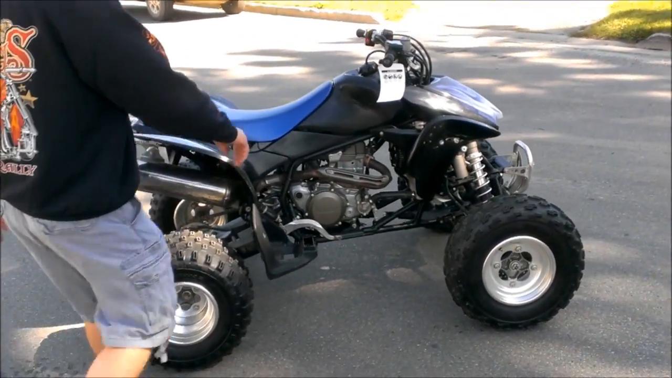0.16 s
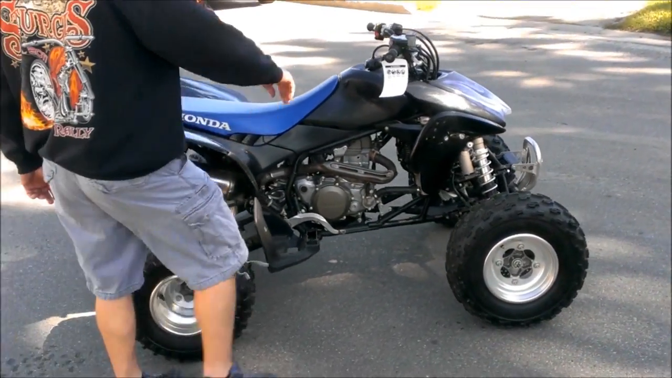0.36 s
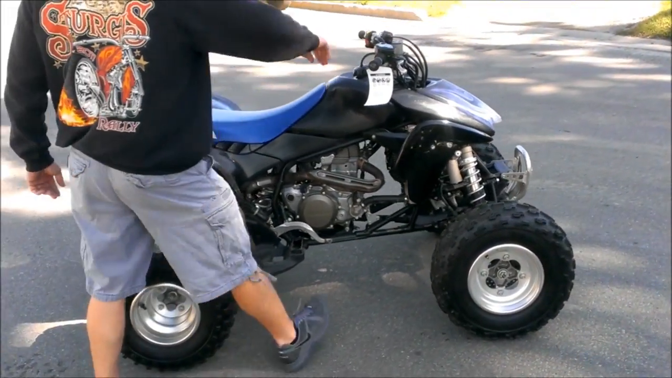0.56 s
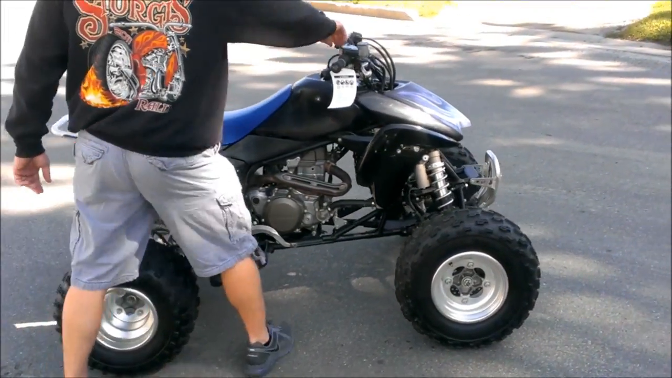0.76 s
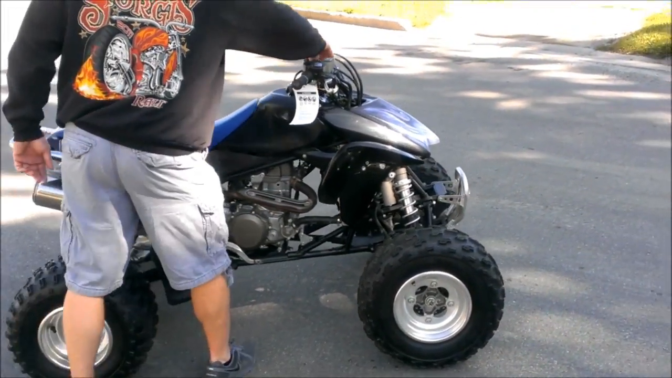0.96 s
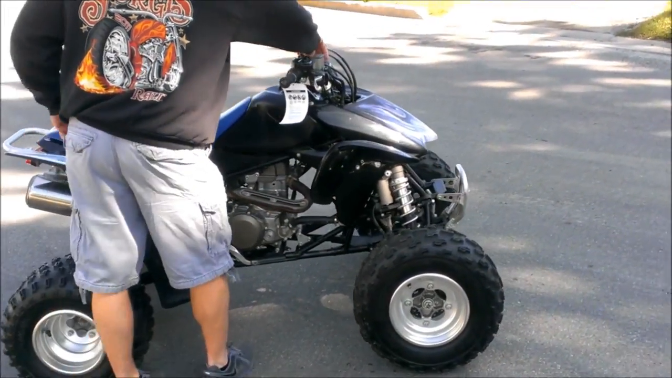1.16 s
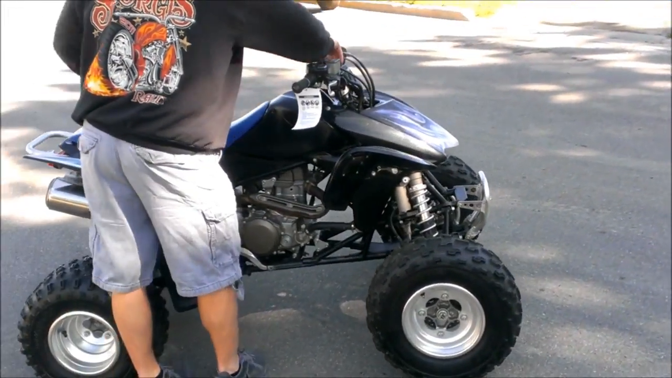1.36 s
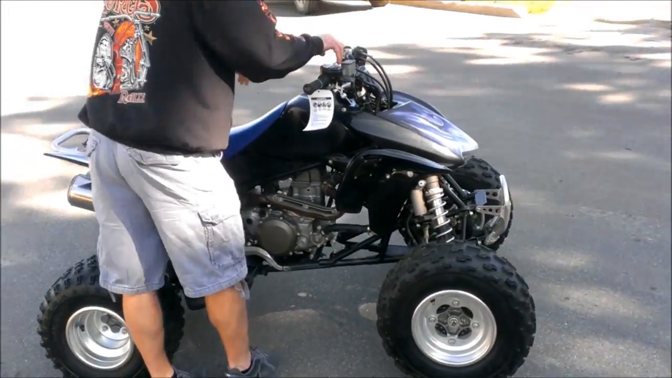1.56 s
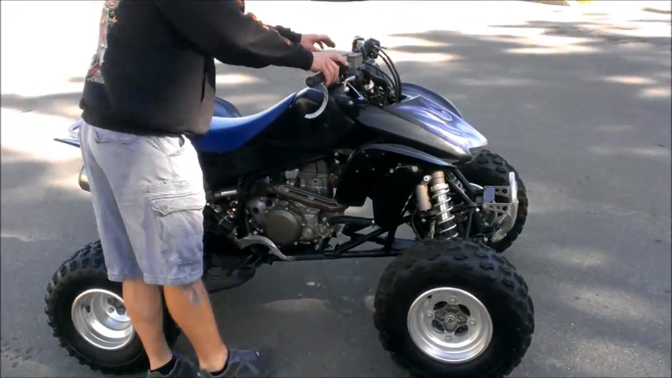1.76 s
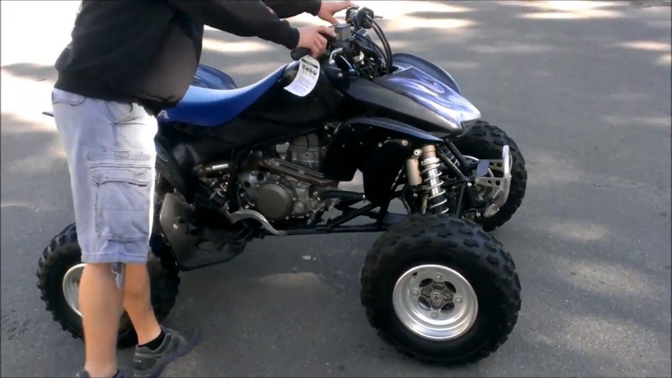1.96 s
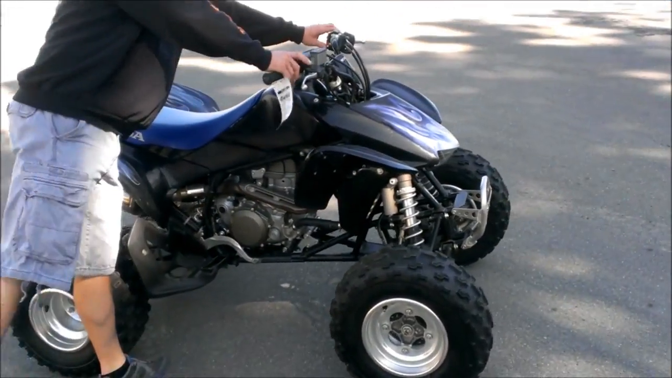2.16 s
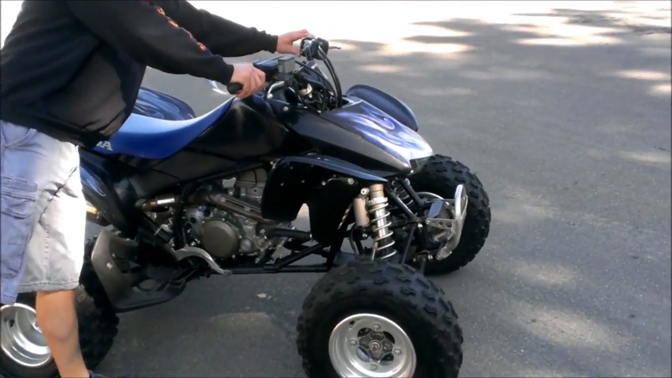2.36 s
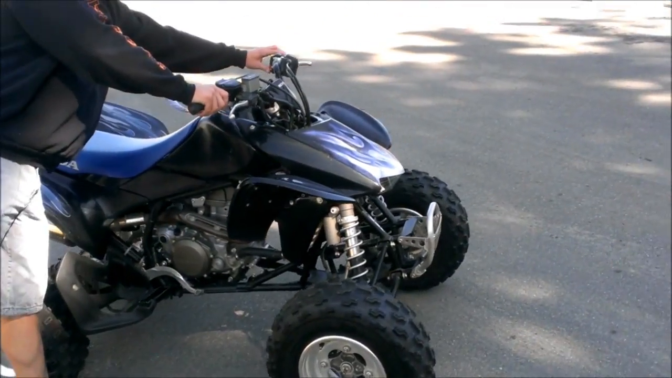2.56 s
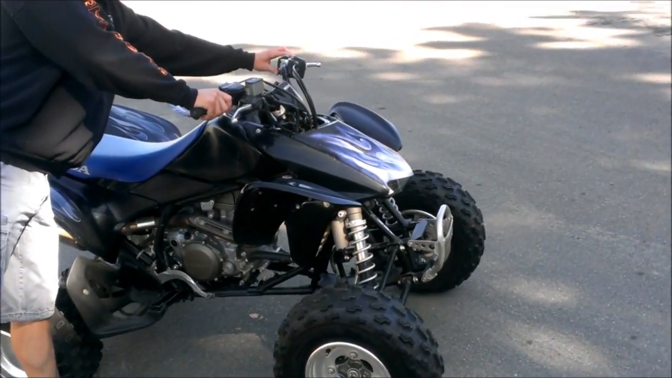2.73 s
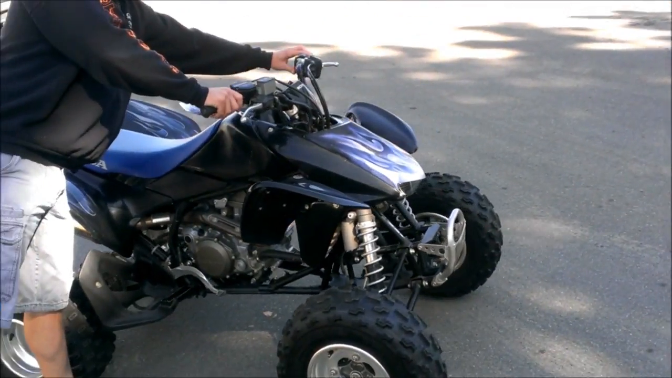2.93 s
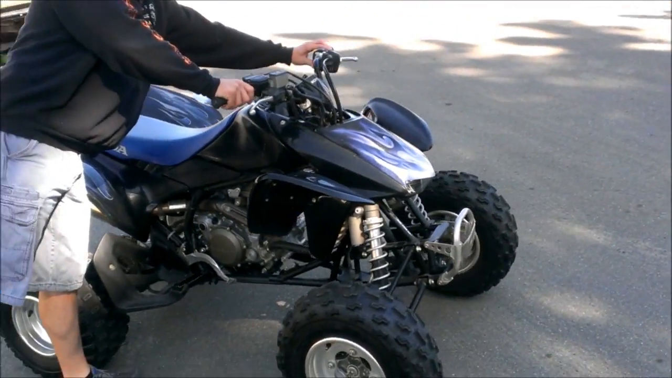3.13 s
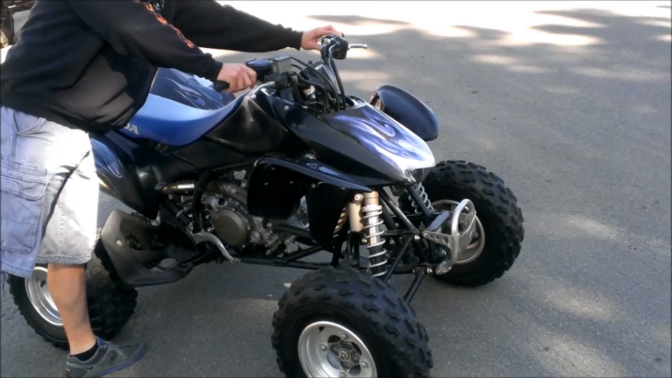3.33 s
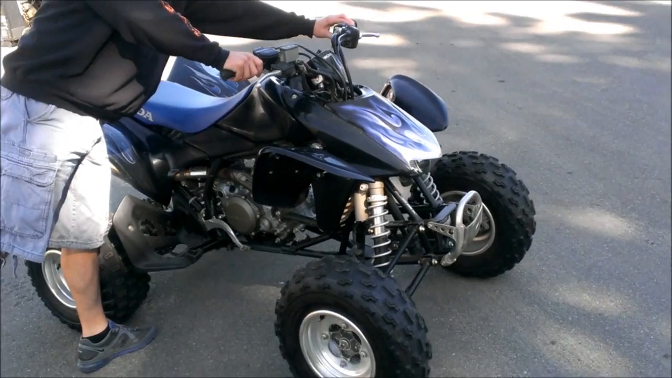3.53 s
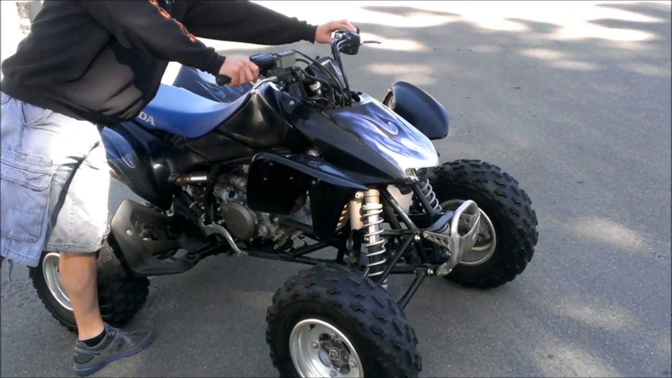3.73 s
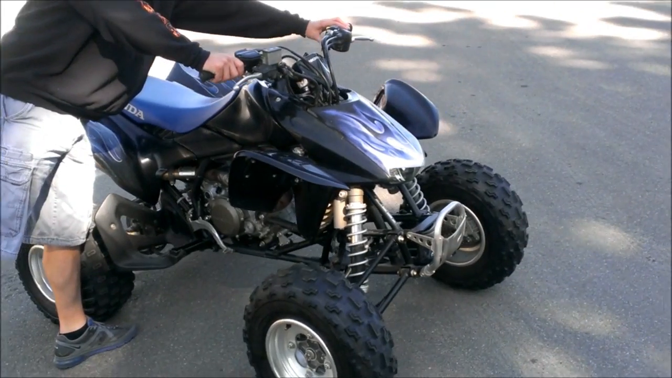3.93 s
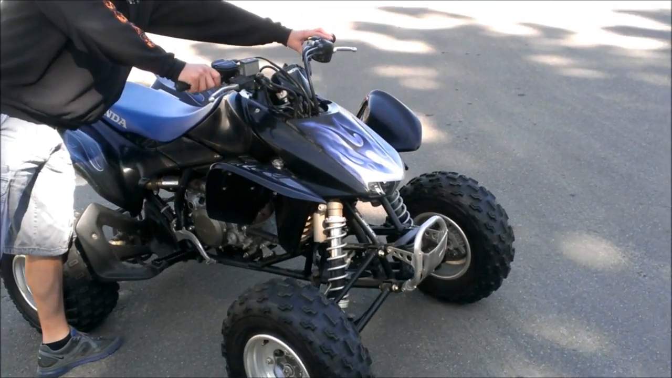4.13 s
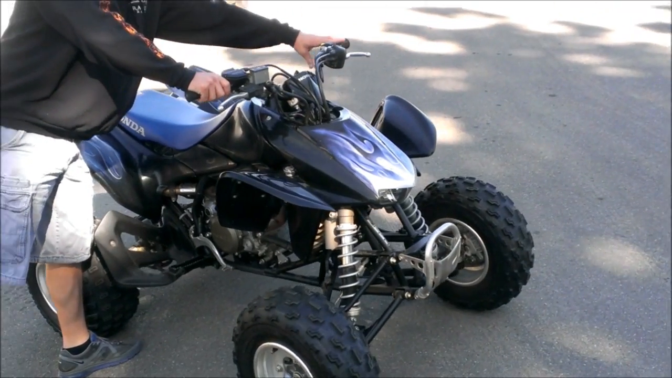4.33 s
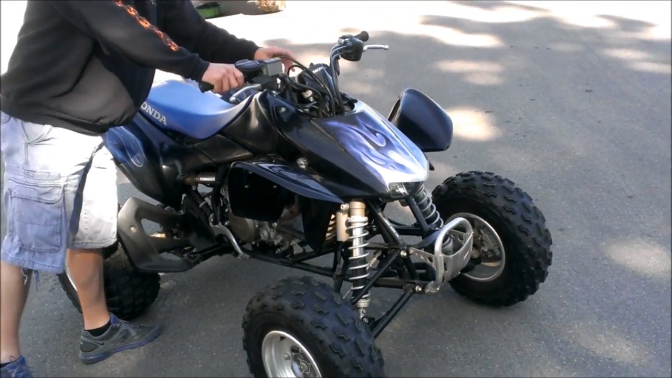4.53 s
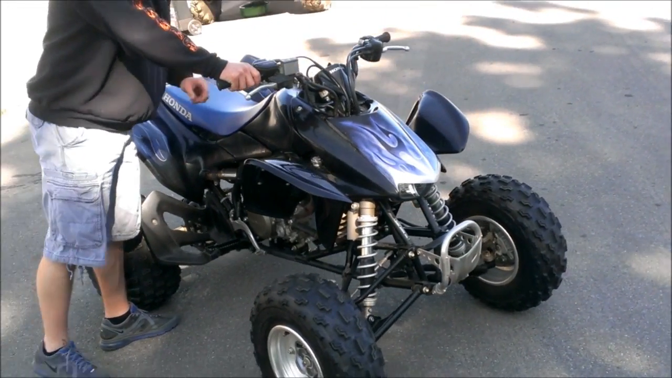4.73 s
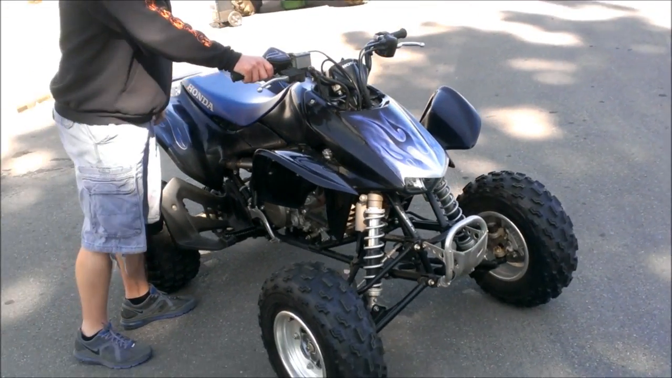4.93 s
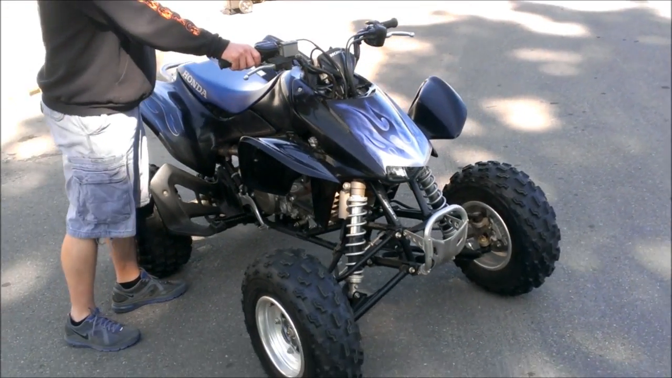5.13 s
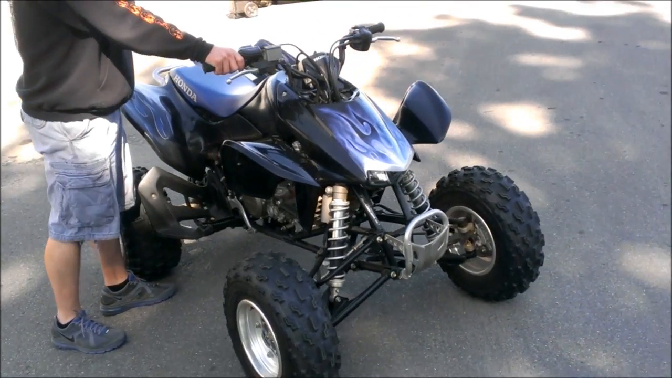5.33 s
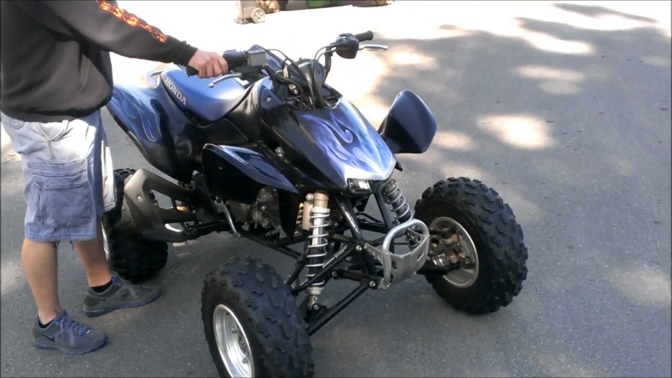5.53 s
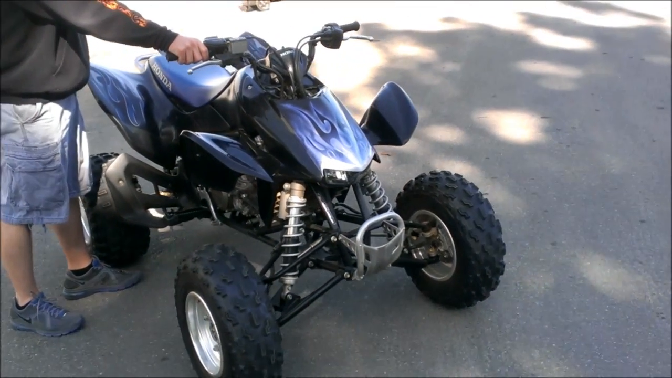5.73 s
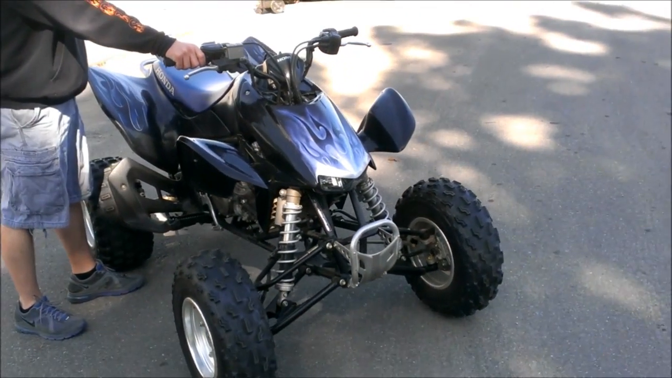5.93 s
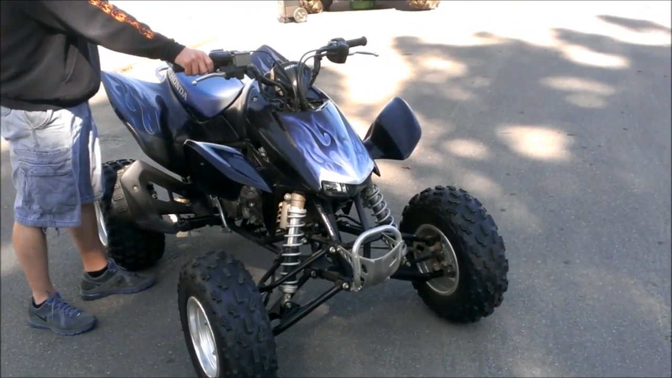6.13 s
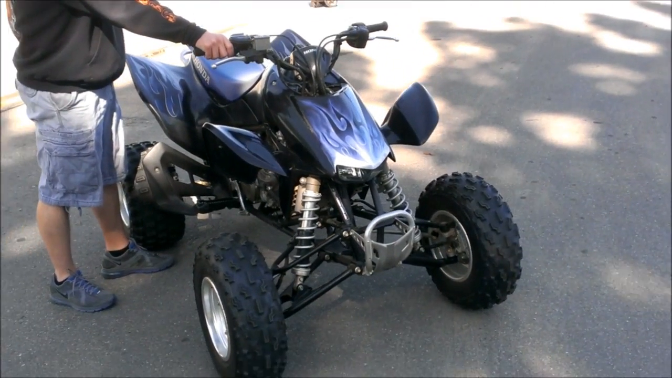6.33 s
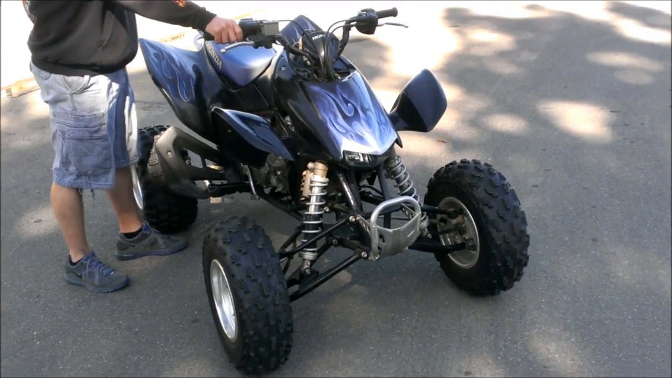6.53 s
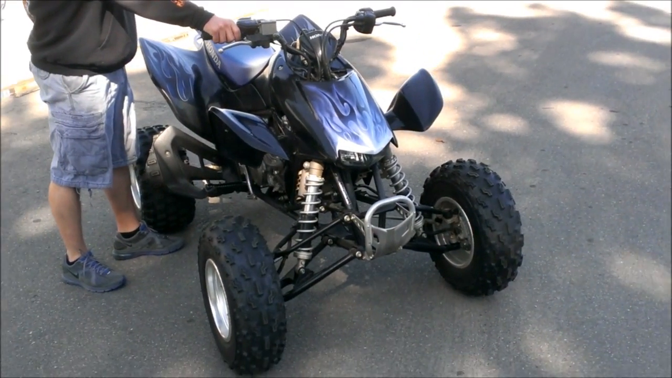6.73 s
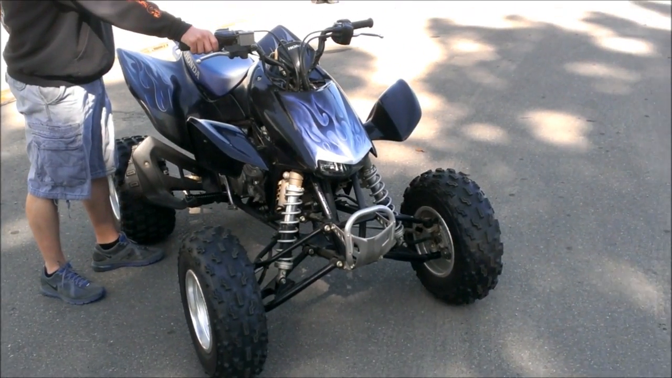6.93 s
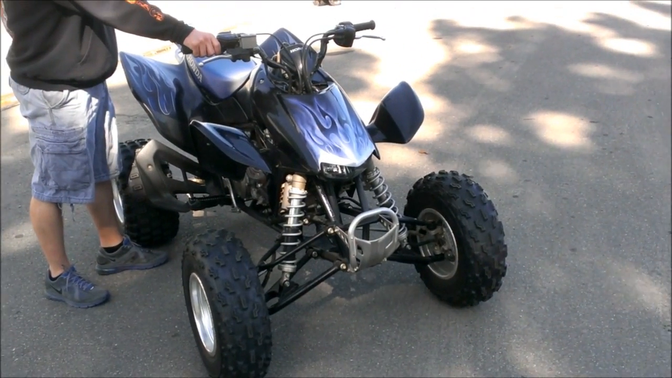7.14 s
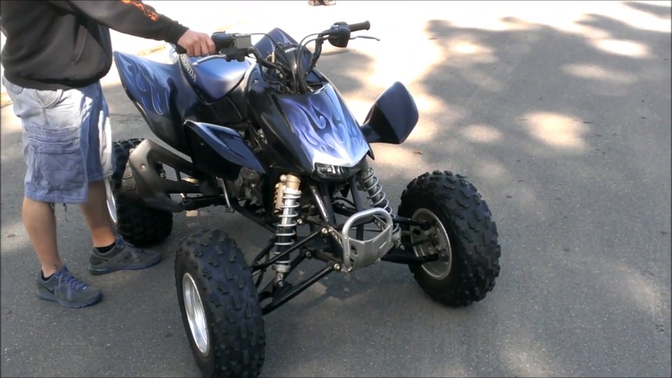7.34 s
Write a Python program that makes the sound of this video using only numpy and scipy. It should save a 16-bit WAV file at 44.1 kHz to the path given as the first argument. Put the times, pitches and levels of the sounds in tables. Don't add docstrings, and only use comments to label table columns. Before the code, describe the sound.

Faint handling clicks and footfalls, a half-second starter grind, then a loud thumping quad bike engine with barking throttle blips and metallic clatter.

```python
import sys
import numpy as np
from scipy import signal
from scipy.fft import rfft, irfft, next_fast_len
from scipy.io import wavfile
from scipy.ndimage import uniform_filter1d, minimum_filter1d

SR = 44100
rng = np.random.default_rng(int(sys.argv[2]) if len(sys.argv) > 2 else 0)


def transcribe(signal):
    frames = np.atleast_2d(signal).T
    limited = np.clip(frames, -1, 1)
    pcm = np.round(limited * 32767).astype(np.int16)
    wavfile.write(sys.argv[1], SR, pcm)


def how_loud(loudness_db):
    steps = np.asarray(loudness_db, float) / 20
    return 10 ** steps


N = 326008
FIRST_BLOW_S, IDLE_PER_S = 3.6351, 15

# start in seconds [s], peak level [dB], pitch [Hz], time to fade by 60 dB [s].
FOOTFALLS = [(0.136, -42, 97, 0.077), (0.311, -57, 45.8, 0.08), (0.312, -44, 67.3, 0.1),
             (0.747, -42, 152, 0.052), (1.093, -29, 112, 0.041), (1.254, -40, 92, 0.073),
             (1.329, -51, 169, 0.16), (1.556, -55, 75.4, 0.088), (1.771, -37, 45.8, 0.08),
             (1.773, -31, 63, 0.048), (1.936, -50, 58.6, 0.082), (2.061, -41, 99, 0.14),
             (2.18, -48, 115, 0.15), (2.4, -40, 88.8, 0.052), (2.557, -40, 56.7, 0.24),
             (2.684, -28.5, 69.6, 0.078), (2.855, -21.5, 85, 0.072)]


def in_time(rows):
    s, *columns = np.transpose(rows)
    return [np.interp(np.arange(N) / SR, s, c) for c in columns]


def between(t0, t1):
    return np.interp(np.arange(N) / SR, [t0, t0 + .003, t1 - .003, t1], [0, 1, 1, 0])


def rms_one(x):
    return x / np.sqrt(np.mean(x ** 2) + 1e-20)


def sine(cycles):
    return np.sin(2 * np.pi * cycles)


def fading(db, t, t60):
    return how_loud(db - 60 * t / t60)


def low_pass(x, order, hz):
    return signal.sosfilt(signal.butter(order, hz, fs=SR, output="sos"), x)


def resonance(x, hz, width_hz):
    r = np.exp(-np.pi * width_hz / SR)
    poles = [1, -2 * r * np.cos(2 * np.pi * hz / SR), r * r]
    return signal.lfilter([(1 - r * r) / 2, 0, (r * r - 1) / 2], poles, x)


def flicker(flicker_hz):
    return rms_one(low_pass(rng.standard_normal(N), 2, flicker_hz))


def grit(grain_db, flicker_hz):
    return rng.standard_normal((2, N)) * how_loud(grain_db * flicker(flicker_hz))


def at_hz(points, hz):
    curve_hz, value = np.transpose(points)
    return np.interp(np.log(hz), np.log(curve_hz), value)


def coloured(spectrum, source):
    # pitch [Hz], likeness from 0 to 1 [share].
    likeness = [(150, 0.87), (700, 0.72), (1200, 0.62), (2000, 0.29), (2500, 0.54), (3500, 0.28),
                (5000, 0.18), (9000, 0.62)]
    size = next_fast_len(N)
    hz = np.maximum(np.arange(size // 2 + 1) * SR / size, 1)
    mid, side = rfft(source, size) * how_loud(at_hz(spectrum, hz))
    alike = np.clip(at_hz(likeness, hz), 0, 1)
    pair = np.sqrt(1 + alike) * mid + np.sqrt(1 - alike) * side * [[1], [-1]]
    return irfft(pair, size)[:, :N]


def add(out, s, sound):
    i = round(s * SR)
    out[..., i:i + sound.shape[-1]] += sound[..., :N - i]


def street():
    # time [s], level over the still street [dB].
    stir = [(0, 5), (.45, 0), (1.1, 8), (1.4, 5.5), (1.55, 1), (1.77, 5), (2.4, 10.5), (2.95, 8.5),
            (3.16, 4.5)]
    # pitch [Hz], level per Hz [dB].
    rumble_colour = [(12, -46.5), (20, -17), (27, -20.5), (48, 0.5), (90, 1.5), (471, -17), (551, -16),
                     (600, -40), (780, -45), (1320, -120)]
    # pitch [Hz], level per Hz [dB].
    rustle_colour = [(180, -28.5), (300, -11), (597, -7.5), (634, -6.5), (830, -1.5), (949, -6), (1320, -9),
                     (1830, -12), (9370, -27), (10500, -12), (13900, -64.5), (22000, -120)]
    stir_db, = in_time(stir)
    steps, t = np.array(FOOTFALLS)[:, 0], np.arange(N) / SR
    last_step = steps[np.clip(np.searchsorted(steps, t) - 1, 0, None)]
    since = np.abs(t - last_step)
    shuffle_db = -1.5 + 3 * np.clip(1.5 - since / 0.073, 0, 1)
    rumble = rms_one(coloured(rumble_colour, grit(2.65, 34)))
    rustle = rms_one(coloured(rustle_colour, grit(0.7, 54)))
    return how_loud(-55 + stir_db + shuffle_db) * rumble + how_loud(-60 + 0.26 * stir_db) * rustle


def bumps():
    # time [s], left over right [dB].
    walk_pan = [(0, -1), (.7, -3), (1.2, 7), (1.7, 0.1), (2.2, -9), (2.7, 17), (3.1, 7)]
    out, t = np.zeros(N), np.arange(int(.2 * SR)) / SR
    for s, db, hz, t60 in FOOTFALLS:
        swell = 1 - np.exp(-t * hz * 0.51)
        add(out, s, fading(db + 13.5, t, t60) * swell * sine(hz * t))
    return out * how_loud(np.outer([.5, -.5], in_time(walk_pan)[0]))


def clicks():
    # pitch [Hz], level [dB], time to fade by 60 dB [s].
    key_modes = [(825, 0.5, 0.012), (1400, -2.5, 0.017), (2370, -5, 0.0079), (2870, -8, 0.0088),
                 (3420, 0, 0.012), (3860, 3, .012), (4500, -8, 0.013)]
    # pitch [Hz], level [dB], fade time [s].
    switch_modes = [(1090, 7.5, 0.019), (1275, 2, 0.041), (1880, 8, 0.015), (2370, 2, .01),
                    (2830, 7.5, 0.014), (3370, -1, 0.017), (3920, -5, 0.015), (4390, 0, 0.025),
                    (6670, -16, 0.012), (7950, -12, 0.0099)]
    # pitch [Hz], level [dB], fade time [s].
    lever_modes = [(474, 8, 0.0062), (1120, 4, 0.0079), (1860, -6, 0.006), (2730, -2, .006),
                   (3350, 6, .008), (4000, 1, 0.016), (4800, -4, 0.006)]
    # pitch [Hz], level [dB], fade time [s].
    panel_modes = [(273, 8, 0.029), (400, 8.5, 0.037), (820, 6, 0.019), (1290, -20, 0.011),
                   (1800, -20, .01), (2288, -6, 0.015), (3860, -20, .012)]
    # pitch [Hz], level [dB], fade time [s].
    cloth_modes = [(500, 5, 0.0056), (1400, -9, 0.0031), (3270, -6, 0.0027), (4280, -6, .004)]
    # pitch [Hz], level [dB], fade time [s].
    latch_modes = [(700, 12, 0.0091), (1100, -2, 0.0063), (1750, -5, .006), (3100, -17, .006)]
    # scrape swell [s], scrape fade [s], tap over scrape [dB], dull above [Hz].
    strikes = [
        (0.0025, 0.015, 2, 4100),
        (0.0034, 0.018, -15, 12000),
        (.0004, .004, 20, 3500),
        (0.00097, 0.024, -9, 2100),
        (0.0096, 0.31, -20, 4100),
        (.0006, .01, 9, 3500),
    ]
    # start [s], peak level [dB].
    key_touches = [
        (.144, -42),
        (.151, -20.5),
        (.155, -24),
        (.159, -36),
        (.163, -28),
        (.171, -33),
        (.182, -40),
        (0.192, -38),
        (1.429, -47),
    ]
    # start [s], peak level [dB].
    switch_touches = [
        (1.317, -43),
        (1.330, -19.5),
        (2.339, -60),
        (2.489, -55),
    ]
    # start [s], peak level [dB].
    lever_touches = [
        (2.415, -16),
    ]
    # start [s], peak level [dB].
    panel_touches = [
        (.329, -48),
        (1.111, -36),
        (1.7856, -27),
        (1.808, -40),
        (2.363, -34),
        (2.906, -27),
    ]
    # start [s], peak level [dB].
    cloth_touches = [
        (.79, -48),
        (1.075, -41.5),
        (1.11, -44),
        (1.77, -43),
        (2.06, -45),
        (2.19, -48),
        (2.855, -39),
    ]
    # start [s], peak level [dB].
    latch_touches = [
        (1.753, -33),
        (.866, -41),
    ]
    # time [s], left over right [dB].
    hand_pan = [(0, -3), (.8, -8), (1.3, 4.5), (1.8, -11), (2.4, -11), (2.9, 2)]

    out, t = np.zeros((2, N)), np.arange(int(.15 * SR)) / SR
    all_modes = key_modes, switch_modes, lever_modes, panel_modes, cloth_modes, latch_modes
    all_touches = key_touches, switch_touches, lever_touches, panel_touches, cloth_touches, latch_touches
    for modes, (swell_s, dies_s, tap_db, dull_hz), touches in zip(all_modes, strikes, all_touches):
        for s, db in touches:
            noise = rng.standard_normal((2, len(t)))
            scrape = fading(0, np.maximum(t - swell_s, 0), dies_s) * np.minimum(t / swell_s, 1) ** 2
            push = (noise[0] + 1.05 * noise) * scrape
            push[:, 0] -= 10 * how_loud(tap_db)
            sound = sum(how_loud(mode_db) * t60 * resonance(push, hz, 2.17 / t60) for hz, mode_db, t60 in modes)
            sound = low_pass(sound, 4, dull_hz)
            scattered = rms_one(resonance(resonance(noise[:, ::-1], 2200, 2500), 2200, 2500))
            tail = fading(-34, t, .25) * np.minimum(t / .008, 1) * scattered
            pan_db = np.interp(s, *np.transpose(hand_pan))
            pan = how_loud([[pan_db / 2], [-pan_db / 2]])
            add(out, s, how_loud(db) * (sound / np.abs(sound).max() + tail) * pan)
    return out


def scuffs():
    # start [s], length [s], pitch [Hz], width [Hz], level [dB].
    rubs = [
        (.79, .05, 2900, 500, -55.5),
        (.845, 0.049, 3400, 1100, -52.5),
        (2.27, .03, 3900, 250, -66),
        (2.328, 0.039, 3800, 250, -60),
        (1.075, 0.059, 4000, 900, -57),
        (1.07, 0.076, 310, 120, -45),
    ]
    out, noise = np.zeros((2, N)), rng.standard_normal((2, int(.1 * SR)))
    for s, length, hz, width_hz, db in rubs:
        t = np.arange(int(min(length, .1) * SR)) / SR
        band = rms_one(resonance(resonance(noise, hz, width_hz), hz, 2 * width_hz))
        add(out, s, how_loud(db) * np.sin(np.pi * t / length) * band[:, :len(t)])
    return out


def creaks():
    # start [s], length [s], pitch [Hz], level [dB].
    groans = [
        (1.34, .08, 700, -56),
        (1.82, .07, 490, -51),
        (1.93, 0.066, 485, -51.5),
        (2.081, 0.26, 356, -52),
        (2.632, .1, 549, -58),
        (2.84, 0.064, 490, -54),
    ]
    out = np.zeros(N)
    for (s, length, hz, db), chance in zip(groans, rng.standard_normal((len(groans), 12))):
        t = np.arange(int(length * SR)) / SR
        uneven = np.interp(t * 40, np.arange(12), chance)
        tone = np.sin(2 * np.pi * hz * t + 0.25 * uneven) + how_loud(-12.5) * sine(2 * hz * t)
        add(out, s, how_loud(db + 4.9 * uneven) * np.sqrt(np.abs(np.sin(np.pi * t / length))) * tone)
    return out


def strokes():
    # start [s], gear level [dB], whine level [dB], top level [dB], overtone level [dB].
    turns = [
        (3.188, -24.5, -38, -36, -37),
        (3.222, -23.5, -43, -39, -53),
        (3.324, -27, -33.5, -36, -39),
        (3.472, -26.5, -29.5, -34.5, -35),
        (3.573, -27.5, -32.5, -36.5, -40),
        (3.643, -32.5, -54, -61, -72),
    ]
    # time [s], share of a full jolt [ratio].
    slack_jolts = [
        (3.188, 0.73),
        (3.255, 0.99),
        (3.327, 1.05),
        (3.47, 0.18),
        (3.491, 0.63),
        (3.578, 1.1),
        (3.591, 1.2),
        (3.609, 0.28),
    ]
    kick_db, labour_db = (6.4, 15, 3.5, 3), (2.5, 7.2, 15, 6.5)
    t, rows = np.arange(N) / SR, np.array(turns)
    k = np.clip(np.searchsorted(rows[:, 0], t) - 1, 0, len(rows) - 1)
    jolt = sum(share * (t > s) * np.exp(-np.abs(t - s) / 0.0098) for s, share in slack_jolts)
    left = np.append(rows[1:, 0], np.inf)[k] - t
    sag = np.clip(1 - left / 0.056, 0, 1)
    level_db = rows[k, 1:].T + np.outer(kick_db, jolt) - np.outer(labour_db, sag)
    return uniform_filter1d(level_db, size=221, axis=1)


def puffs():
    # start [s], pitch [Hz], ring level [dB], rush level [dB], ring fade time [s].
    breaths = [
        (3.24, 91.2, -43.5, -37, 0.96),
        (3.338, 74.8, -32.5, -31.5, 0.54),
        (3.576, 97, -34, -34.5, 0.32),
    ]
    ring, rush, t = np.zeros(N), np.zeros(N), np.arange(int(.2 * SR)) / SR
    swell = np.minimum(t / 0.0098, 1)
    ending = np.clip((.15 - t) / 0.02, 0, 1)
    for s, hz, ring_db, rush_db, t60 in breaths:
        tone = sine(hz * t) + 0.21 * sine(2 * hz * t)
        add(ring, s, swell * fading(ring_db + 16.5, t, t60) * tone * ending)
        add(rush, s, fading(rush_db, t, 0.1))
    return ring + (rush + how_loud(-51)) * rms_one(resonance(rng.standard_normal(N), 460, 180))


def starter():
    # time [s], pitch [Hz].
    whine_pitch = [(3.19, 1320), (3.27, 1245), (3.33, 1330), (3.41, 1410), (3.45, 1400), (3.475, 1450),
                   (3.53, 1310), (3.575, 1440), (3.615, 1225)]
    # multiple of the whine pitch [ratio], level [dB].
    overtones = [(2, 7.5), (3, -2), (5, -11)]
    # pitch [Hz], level per Hz [dB].
    grind_colour = [(290, -5), (500, -9), (857, -11), (1380, 6), (1970, -14.5), (3170, 8.5), (3560, 0),
                    (4200, 1.5), (5720, -11.5), (9670, 1.5), (10700, -76), (13900, -56), (22000, -120)]
    # pitch [Hz], width [Hz], level [dB].
    gear_modes = [(1840, 14, -12.5), (2105, 35, -11), (2600, 420, -11.5), (3170, 84, -1), (4000, 430, -18),
                  (4900, 350, -16.5), (6400, 130, -27), (7040, 170, -21), (8470, 110, -10.5),
                  (10100, 640, -4.5)]
    # time [s], level [dB].
    ring_gear = [(3.19, -48), (3.6, -37), (3.75, -38), (3.95, -41), (4.05, -46), (4.25, -57)]
    gear_db, whine_db, top_db, over_db = strokes()
    whine_hz, = in_time(whine_pitch)

    broad = rms_one(coloured(grind_colour, grit(0.64, 105)))
    flat = coloured([(100, 0.013), (10000, 0.025)], grit(2.6, 93))
    tones = sum(how_loud(db + 5 * flicker(30)) * resonance(flat, hz, w) for hz, w, db in gear_modes)
    teeth = 0.71 * broad + rms_one(tones)
    grind = rms_one(low_pass(teeth, 4, 5400))
    top = signal.sosfilt(signal.butter(6, [5200, 10300], "band", fs=SR, output="sos"), teeth)
    top = how_loud([[3.0], [-5.0]]) * rms_one(top)

    wobble = flicker(70)
    turned = 2 * np.pi * np.cumsum(whine_hz) / SR
    whine = np.sin(turned + .5 * wobble) + 0.27 * np.sin(.3 * turned + .5 * wobble)
    whine = whine * (1 + .5 * wobble)
    over = sum(how_loud(db + 3.7 * flicker(25)) * np.sin(k * (turned + 0.23 * wobble)) for k, db in overtones)

    ring = np.sin(2 * np.pi * 3162 * np.arange(N) / SR + .4 * flicker(30))
    ring = ring * how_loud(in_time(ring_gear)[0] + 1.5 * flicker(25)) * between(3.19, 5.7)
    motor = how_loud(gear_db + 3.0) * grind + how_loud(top_db + 7.0) * top
    motor = motor + how_loud(whine_db + 4.0) * whine + how_loud(over_db + 3.0) * over
    return between(3.19, 3.66) * (motor + puffs()) + ring


def crank():
    # time [s], exhaust blows per second [1/s].
    blow_rate = [(3.631, 8.391), (3.772, 17.193), (3.886, 14.702), (4.079, 16.484), (4.142, 22.063),
                 (4.249, 20.253), (4.439, 15.078), (4.528, 33.077), (4.585, 33.1), (4.716, 24.578),
                 (4.961, 16.507), (5.23, 14.303), (5.659, 18.002), (5.868, 23.929), (6.016, 25.032),
                 (7.188, 23.177), (7.287, 28.371), (7.344, 24.08)]
    speed, = in_time(blow_rate)
    return speed, np.cumsum(speed * (np.arange(N) > FIRST_BLOW_S * SR)) / SR


def gas_heat():
    # time [s], gas heat from 0 idle to 3 wide open [steps].
    held = [(5.47, 0), (5.70, .3), (5.92, 2), (6.78, 1.9), (6.86, 1)]
    # start [s], heat in the pipe [steps], open time [s], muffler stays hot [s].
    snaps = [
        (4.10, .6, .2, .21),
        (4.468, 3, .17, .36),
        (7.242, 3, .02, .3),
    ]
    rise_s, fall_s = .02, .05
    t = np.arange(N) / SR
    pipe = muffler = in_time(held)[0]
    for s, heat, open_s, hot_s in snaps:
        hot_times = np.cumsum([s - rise_s, rise_s, hot_s, fall_s])
        hot = np.interp(t, hot_times, [0, 3, 3 - 1.9 * hot_s, 0])
        open_times = np.cumsum([s - rise_s, rise_s, open_s, fall_s])
        blown = np.interp(t, open_times, [0, heat, heat * .85, 0])
        muffler = np.maximum(muffler, hot)
        pipe = np.maximum(pipe, np.maximum(blown, .22 * hot))
    return pipe, np.maximum(muffler, pipe)


def engine_db(speed, heats, idle_db, per_speed_db, per_pipe_db, per_muffler_db):
    return idle_db + per_speed_db * (speed - IDLE_PER_S) + per_pipe_db * heats[0] + per_muffler_db * heats[1]


def at_heat(states, heat):
    return np.array([np.interp(heat, range(len(states)), c) for c in np.reshape(states, (len(states), -1)).T])


def rough_running():
    # start [s], length [s], extra bark [dB], extra rasp [dB], extra rattle [dB].
    spells = [
        (3.72, .32, 1, -5, 1.5),
        (4.114, 0.41, 1.5, -2, 1),
        (4.47, 0.072, 0.5, 16, 4),
        (4.603, .3, 1, 15.5, 3.5),
        (7.224, .2, -2, 15, 5),
    ]
    t, edge_s, total = np.arange(N) / SR, 0.05, 0
    for s, length, *extra_db in spells:
        times = np.cumsum([s - edge_s, edge_s, length, edge_s])
        total = total + np.outer(extra_db, np.interp(t, times, [0, 1, 1, 0]))
    return total


def exhaust(done, heats, boom_db, bark_db, rasp_db, ring_db):
    # pitch [Hz], level [dB], fade time [s], first swing + push / - pull [sign].
    pipe_idle = [(89.0, -17.4, 1.0, -1.0), (124.0, -8.0, 1.0, 1.0), (221.0, -20.0, 0.383, -1.0),
                 (267.0, -18.5, 1.0, -1.0), (369.0, -18.2, 0.174, -1.0), (442.0, -17.9, 0.28, -1.0),
                 (459.0, -16.5, 0.391, -1.0), (561.0, -21.5, 1.0, -1.0)]
    # pitch [Hz], level [dB], fade time [s], first swing [sign].
    pipe_warm = [(98.0, -17.5, 1.0, -1.0), (131.0, -7.3, 0.197, 1.0), (187.0, -13.0, 1.0, -1.0),
                 (244.0, -12.9, 0.147, -1.0), (314.0, -25.0, 1.0, 1.0), (395.0, -21.7, 1.0, -1.0),
                 (427.0, -19.3, 1.0, 1.0), (457.0, -13.0, 0.189, -1.0)]
    # pitch [Hz], level [dB], fade time [s], first swing [sign].
    pipe_hot = [(114.0, -19.8, 1.0, -1.0), (139.0, -9.6, 0.897, 1.0), (182.0, -15.6, 0.301, -1.0),
                (262.0, -13.6, 0.329, -1.0), (453.0, -23.1, 1.0, 1.0), (467.0, -16.5, 0.918, -1.0),
                (524.0, -12.5, 1.0, 1.0), (583.0, -18.9, 0.058, 1.0)]
    # pitch [Hz], level [dB], fade time [s], first swing [sign].
    pipe_snap = [(81.0, -24.5, 1.0, -1.0), (148.0, -12.6, 0.156, 1.0), (188.0, -14.4, 1.0, -1.0),
                 (251.0, -30.0, 1.0, -1.0), (352.0, -22.0, 0.086, -1.0), (472.0, -17.5, 0.3, -1.0),
                 (542.0, -16.0, 0.154, 1.0), (602.0, -9.0, 0.099, -1.0)]
    # pitch sag [per s], valve open time [s].
    blow = [
        (6.0, .0313),
        (0, .0361),
        (3.54, .0285),
        (3.59, .027),
    ]
    # dying time [s], rushing gas level [dB].
    blow_end = [
        (0.012, -51.5),
        (0.0032, -44.5),
        (0.0035, -24),
        (0.021, -30),
    ]
    # pitch [Hz], width [Hz], level [dB].
    after_ring = [(322.2, 52, -23), (462.8, 21, -23.5), (860, 110, -37)]
    # time [s], pitch [Hz], level [dB].
    end_cap = [(4.4, 750, -48), (5.35, 750, -42), (5.65, 775, -28), (6.0, 815, -28), (6.3, 797, -28),
               (6.65, 795, -38)]

    times = np.searchsorted(done, np.arange(int(done[-1]) + 1), side="right") / SR
    pipes = np.array([pipe_idle, pipe_warm, pipe_hot, pipe_snap])
    t = np.arange(int(.075 * SR)) / SR
    column = t[:, None]
    layers = np.zeros((2, N))
    rush, spit, cap = np.zeros((3, N))
    cap_curves = in_time(end_cap)
    for at, chance in zip(times, rng.standard_normal((len(times), 17))):
        i = int(at * SR)
        rough = np.clip((rasp_db[i] + 42) / 10, 0, 1)
        detune = .07 * rough * (heats[0][i] < 2) * chance[9:] * (np.arange(8) > 3)
        for layer, modes, heat_curve in zip(layers, (slice(0, 4), slice(4, 8)), heats):
            heat = heat_curve[i]
            hz, level_db, t60, swing = at_heat(pipes[:, modes], heat).reshape(4, 4).T
            sag, open_s = at_heat(blow, heat)
            dying_s, rush_db = at_heat(blow_end, heat)
            start_hz = hz * (1 + .008 * chance[8] + detune[modes])
            cycles = start_hz * column * (1 - sag * np.minimum(column, .05))
            choke = np.exp(-np.maximum(column - open_s, 0) / dying_s)
            rings = swing * fading(level_db + 1.4 * chance[modes], column, t60) * sine(cycles)
            add(layer, at, (rings * choke).sum(axis=1))
        add(rush, at, how_loud(rush_db) * choke[:, 0])
        front = 785 * (1 + 0.15 * chance[7]) * t * (1 - 6 * np.minimum(t, .03))
        add(spit, at, -fading(rasp_db[i] + 11 + 1.6 * chance[6], t, 0.017) * sine(front))
        cap_hz, cap_db = (c[i] for c in cap_curves)
        add(cap, at, fading(cap_db + chance[5], t, .14) * sine(cap_hz * t))
        add(layers[1], at, -fading(-14, t, .035) * sine((540 + 30 * heat) * t))

    noise = rng.standard_normal((2, N))
    ring = sum(how_loud(db) * rms_one(resonance(noise[0], hz, w)) for hz, w, db in after_ring)
    ring = how_loud(ring_db) * ring * between(3.63, 8)
    roar = rush * rms_one(resonance(resonance(noise[1], 580, 360), 600, 1000))
    pipe = how_loud(boom_db + 1.5) * layers[0] + how_loud(bark_db - 3.5) * (layers[1] + roar + ring)
    rasp = rms_one(resonance(resonance(grit(3.5, 60)[0], 700, 270), 800, 500))
    rasp = how_loud(rasp_db) * between(4.6, 8) * rasp
    return low_pass(pipe, 6, 730) + rasp + cap + resonance(spit, 750, 900)


def hard_firings():
    # time [s], length [s], extra clatter [dB], extra hiss [dB].
    knocks = [
        (3.874, .14, 1.5, 2),
        (7.288, 0.037, 2.5, 2.5),
        (3.91, 0.026, 1, 1.5),
        (4.138, 0.0095, 1.5, 4),
        (4.189, .014, 4.5, 6),
        (4.342, 0.0074, 2, -1),
        (4.462, 0.0035, 5.5, 10.5),
        (4.522, 0.009, 3, 1),
        (5.774, 0.0066, 4.5, 6),
        (6.697, 0.017, 4, 3),
    ]
    t = np.arange(N) / SR
    return sum(np.outer(extra_db, np.exp(-.5 * ((t - s) / length) ** 2)) for s, length, *extra_db in knocks)


def head(done, clatter_db, rattle_db, hiss_db, knock_db):
    # place before the blow [cycle share], length [cycle share], level [dB].
    contacts = [
        (.22, .075, 0),
        (.07, .04, -8),
        (.55, .06, -10),
        (.8, .05, -12),
    ]
    # pitch [Hz], level per Hz [dB].
    clatter_colour = [(440, -40), (750, 6), (905, 2), (989, -5), (1080, 3), (1230, -3.5), (1350, -3),
                      (1560, 0), (1990, -10), (2200, -5.5), (3000, -2.5), (4930, -12), (5890, -26.5),
                      (10600, -52), (13800, -95), (22000, -120)]
    # pitch [Hz], level per Hz [dB].
    hiss_colour = [(4000, -48.5), (5200, -2.5), (5600, -3), (7000, -6.5), (8500, -10), (10200, -7.5),
                   (11000, -9.5)]
    # pitch [Hz], width [Hz], level [dB].
    casing = [(1006, 9.6, 4), (1296, 120, -0.5), (2600, 1300, -15), (3500, 230, -21.5), (4700, 1200, -21)]
    # pitch [Hz], width [Hz], level [dB].
    knock_modes = [(1200, 97, -22.5), (1010, 100, -24), (1384, 32, -38), (1527, 68, -33.5), (2656, 38, -37),
                   (3160, 43, -42.5), (4040, 36, -44.5), (4980, 49, -49)]
    strength = how_loud(1.5 * rng.standard_normal((len(contacts), int(done[-1]) + 3)))
    shake = how_loud(rattle_db)
    for (before, length, db), each in zip(contacts, strength):
        place = done + before + .5
        pulse = np.exp(-.5 * ((place % 1 - .5) / length) ** 2)
        shake += how_loud(db) * each[place.astype(int)] * pulse
    source = grit(0.47, 480) * shake
    broad = rms_one(coloured(clatter_colour, source))
    tones = rms_one(sum(how_loud(db) * resonance(broad, hz, w) for hz, w, db in casing))
    hiss = coloured(hiss_colour, source + 0.42 * grit(1.0, 400))[0]
    low = rms_one(low_pass(broad + 0.74 * tones, 6, 5300))

    fired = np.diff(np.floor(done + 0.22), prepend=0) * strength[0][(done + .75).astype(int)]
    uneven = how_loud(1.8 * rng.standard_normal((len(knock_modes), int(done[-1]) + 1)))
    for (hz, w, db), each in zip(knock_modes, uneven):
        taps = fired * each[done.astype(int)] + 1e-18
        struck = rms_one(resonance(resonance(taps, hz, w), hz, 320))
        low = low + 0.5 * how_loud(db + 24.0 + knock_db) * struck
    return between(3.62, 8) * (how_loud(clatter_db - 1.5) * low + how_loud(hiss_db - 1.0) * rms_one(hiss))


def squeaks():
    # start [s], length [s], first pitch [Hz], last pitch [Hz], level [dB].
    glides = [(3.70, 0.025, 3190, 3180, -24.5), (3.99, 0.082, 5200, 4950, -48),
              (4.437, .016, 6600, 6640, -44), (6.387, .035, 1000, 1005, -25),
              (6.511, .035, 973, 970, -21.5), (6.678, .035, 1022, 1015, -19), (6.805, .03, 1005, 1000, -37),
              (7.235, 0.0075, 3540, 3400, -23), (7.264, 0.0083, 2670, 2660, -21),
              (7.299, 0.0067, 1080, 1000, -23), (7.316, 0.013, 1290, 970, -19),
              (7.340, 0.0087, 2640, 2600, -20.5), (7.341, 0.0086, 2130, 2130, -27)]
    out = np.zeros(N)
    for s, length, from_hz, to_hz, db in glides:
        t = np.arange(int(length * SR)) / SR
        mean_hz = from_hz + (to_hz - from_hz) * t / length / 2
        add(out, s, how_loud(db) * np.sin(np.pi * t / length) * sine(t * mean_hz))
    return out


def blasts():
    # start [s], pitch [Hz], level [dB].
    bright_blows = [(4.104, 553, -7), (4.152, 530, -14), (4.297, 524, -15), (4.470, 716, -8),
                    (4.508, 723, -3.5), (4.540, 640, -6), (4.570, 730, -12), (4.625, 740, -15.5),
                    (4.712, 765, -8), (4.745, 800, -14), (4.85, 600, -14), (7.245, 755, -14.5)]
    out, t = np.zeros(N), np.arange(int(0.044 * SR)) / SR
    for s, hz, db in bright_blows:
        add(out, s, -fading(db, t, 0.057) * np.minimum(t / .0015, 1) * sine(hz * t * (1 - 9 * t)))
    return out


def ports(pair, leads):
    size = next_fast_len(N)
    lead = at_hz_from_zero(leads, np.maximum(np.arange(size // 2 + 1) * SR / size, 1))
    return irfft(rfft(pair, size) * np.exp(.5j * lead * [[1], [-1]]), size)[:, :N]


def at_hz_from_zero(points, hz):
    with np.errstate(divide="ignore"):
        return at_hz(points, hz)


def scene():
    # delay [s], level [dB].
    echoes = [
        (.0031, -31.5),
        (.0047, -19.5),
    ]
    # pitch [Hz], lead [radians].
    block_lead = [(0, 0), (1640, 0.54), (2150, -6.5), (2410, -6.5), (2840, -6), (4050, -7), (6290, -6),
                  (10400, -7.5)]
    # pitch [Hz], lead [radians].
    starter_lead = [(0, 0), (1640, 0.4), (1980, -2.5), (2410, -0.5), (3190, 4.5), (4050, 12.5), (5080, 12),
                    (10400, 13)]
    left_lead_s = .00002
    speed, done = crank()
    heats, k = gas_heat(), np.arange(N)
    boom_db = engine_db(speed, heats, -0.6, 0.072, 0.94, -1.1)
    bark_db = engine_db(speed, heats, 3, 0.4642, -1.5, 0.05)
    rasp_db = engine_db(speed, heats, -49, .5, -6, 4)
    ring_db = engine_db(speed, heats, 0.1, 0.051, 0.41, -1.17)
    clatter_db = engine_db(speed, heats, -30.5, 0.31, -1.26, 1)
    rattle_db = engine_db(speed, heats, -7, -0.4152, 2.5, 0.1)
    hiss_db = engine_db(speed, heats, -54.5, 0.81, -1.97, 1)
    knock_db = engine_db(speed, heats, -1.2, -0.096, 2.5, -2.5)
    bark_db, rasp_db, rattle_db = np.array([bark_db, rasp_db, rattle_db]) + rough_running()

    since = np.maximum(k / SR - FIRST_BLOW_S, 0)
    weak_db = 2.5 * np.clip(1 - since / 0.1, 0, 1)
    pipe = exhaust(done, heats, boom_db - weak_db, bark_db - weak_db, rasp_db, ring_db) + blasts()
    pipe = pipe + how_loud(-41.5 + 0.66 * (speed - IDLE_PER_S)) * sine(2 * done)
    pipe = pipe + how_loud(engine_db(speed, heats, -38, 1, 1, -1)) * sine(3 * done)
    pair = np.zeros((2, N))
    for out, side, (s, db) in zip(pair, (1, -1), echoes):
        direct = np.interp(k + side * left_lead_s * SR / 2, k, pipe)
        out += direct + how_loud(db) * np.interp(k - s * SR, k, pipe)

    hiss_db = hiss_db + 4 * np.exp(-since / 0.62)
    clatter_db, hiss_db = np.array([clatter_db, hiss_db]) + hard_firings()
    knock_db = knock_db + 2 * (since - 2)
    engine = pair + ports(head(done, clatter_db, rattle_db, hiss_db, knock_db), block_lead)
    person = street() + bumps() + clicks() + scuffs() + creaks()
    return person + ports(starter(), starter_lead) + engine + squeaks()


def band_limit(x):
    return signal.sosfilt(signal.butter(12, 10870, fs=SR, output="sos"), x)


def record(dry):
    ceiling = .81
    bass_cut = signal.butter(2, 36, "high", fs=SR, output="sos")
    top_cut = signal.cheby2(12, 50, 10800, fs=SR, output="sos")
    dry = signal.sosfilt(np.vstack([bass_cut, top_cut]), dry)
    over_db = np.maximum(20 * np.log10(np.abs(dry).max(axis=0) / ceiling + 1e-9), 0)
    slope_db = 900 * np.arange(N) / SR
    held_db = np.maximum.accumulate(over_db + slope_db) - slope_db
    ahead_db = uniform_filter1d(-minimum_filter1d(-held_db, size=101), size=101)
    return band_limit(dry * how_loud(-ahead_db))


dry = scene()
out = record(dry)
transcribe(out)
```